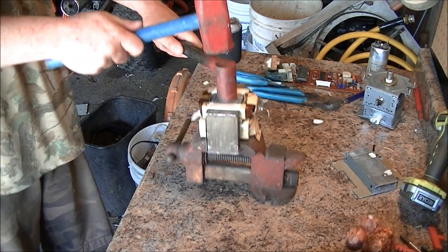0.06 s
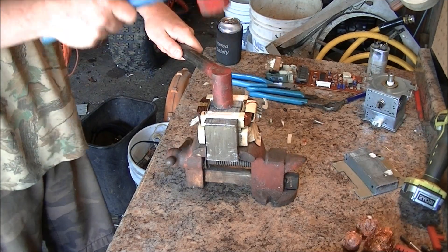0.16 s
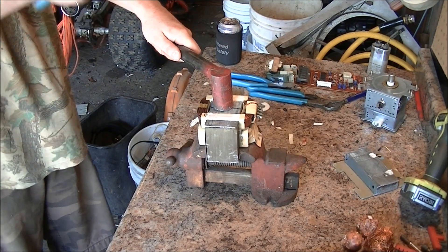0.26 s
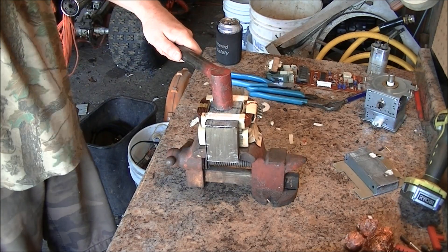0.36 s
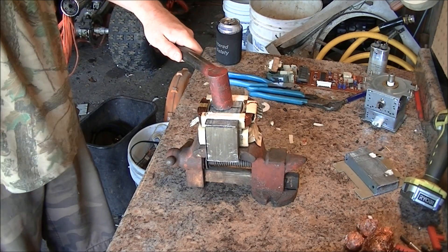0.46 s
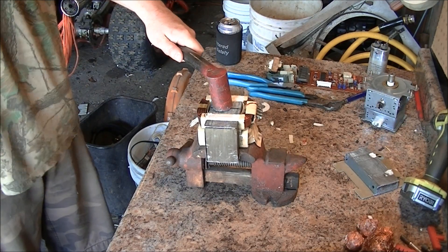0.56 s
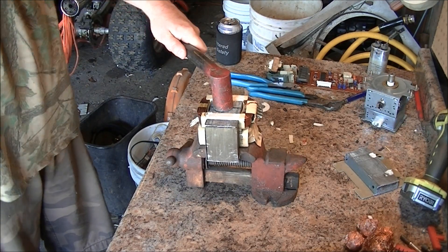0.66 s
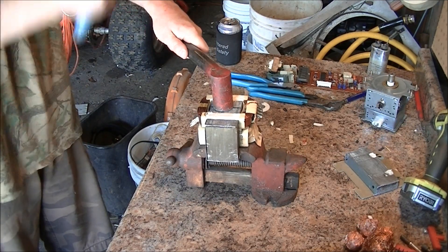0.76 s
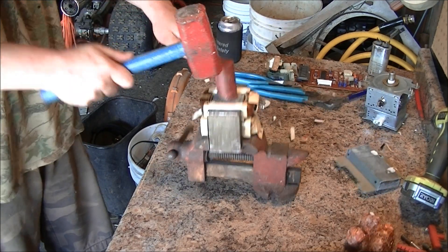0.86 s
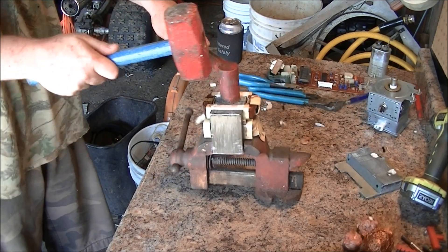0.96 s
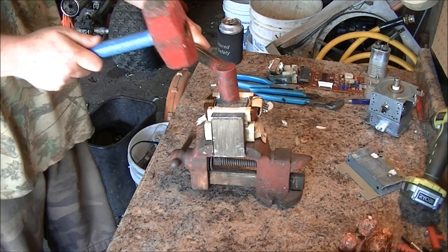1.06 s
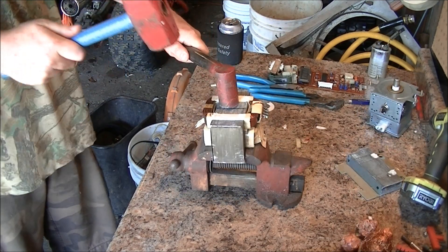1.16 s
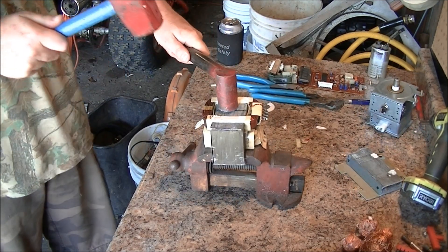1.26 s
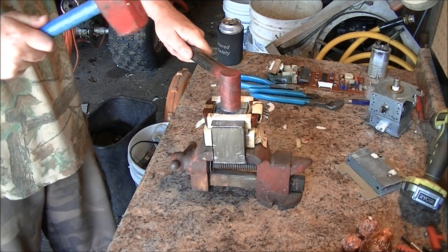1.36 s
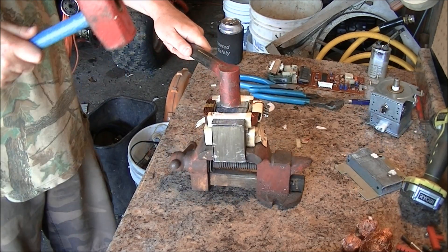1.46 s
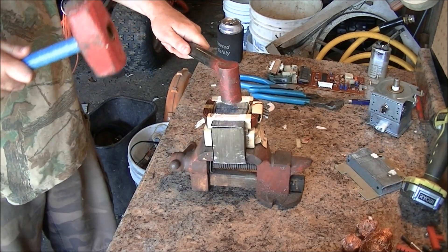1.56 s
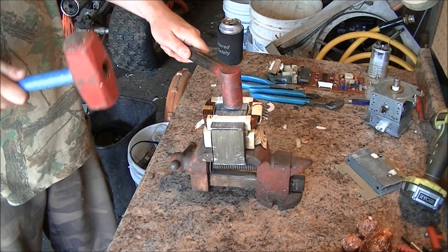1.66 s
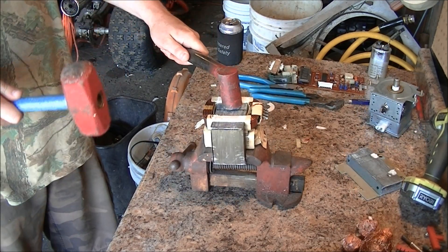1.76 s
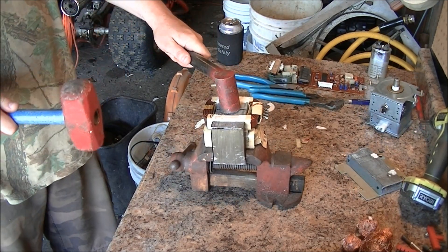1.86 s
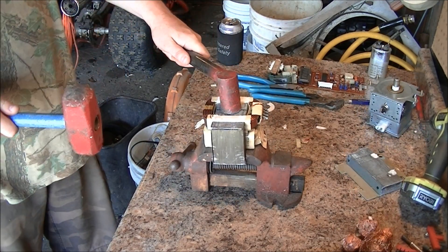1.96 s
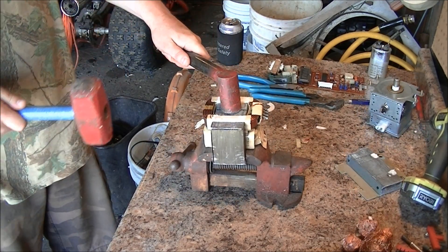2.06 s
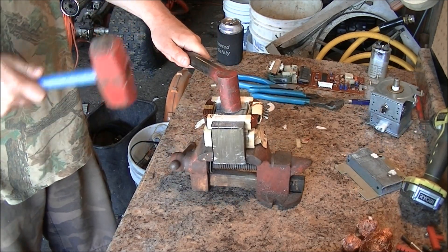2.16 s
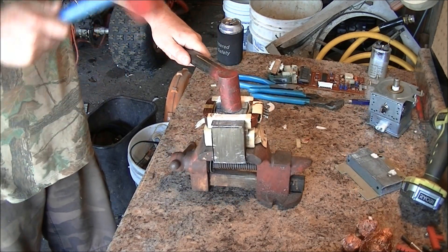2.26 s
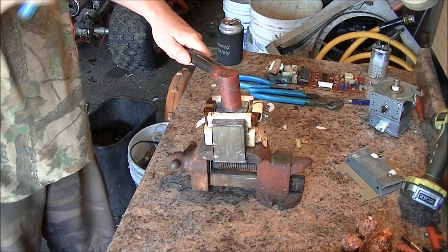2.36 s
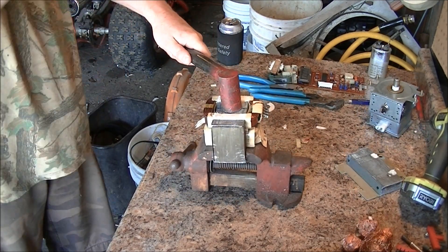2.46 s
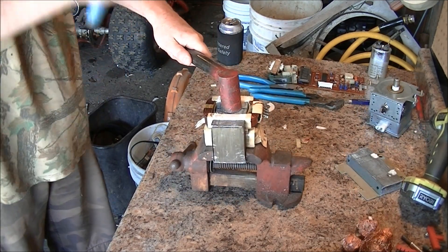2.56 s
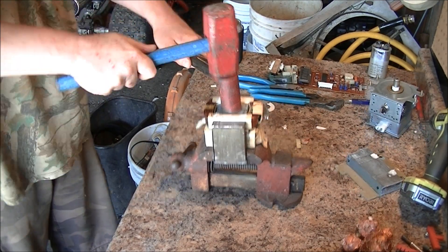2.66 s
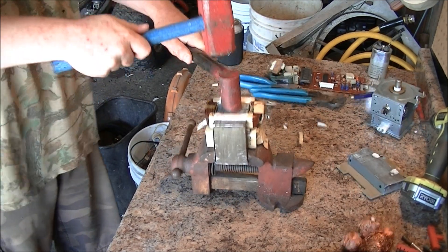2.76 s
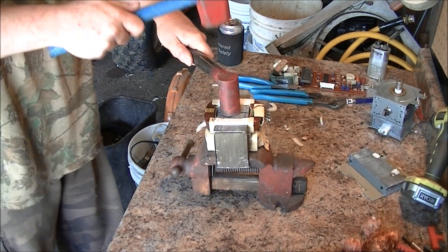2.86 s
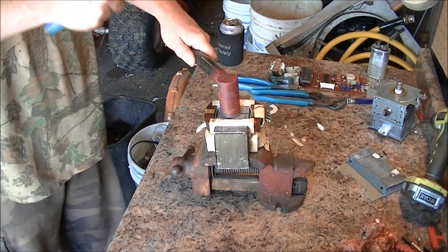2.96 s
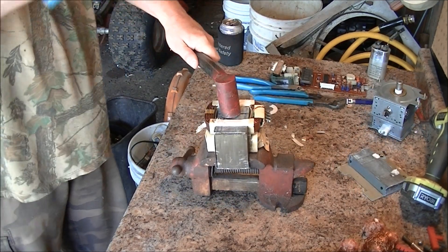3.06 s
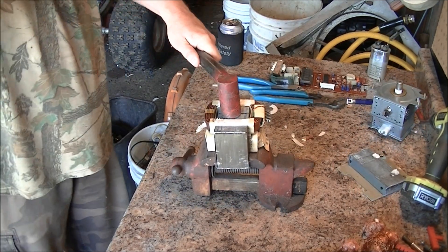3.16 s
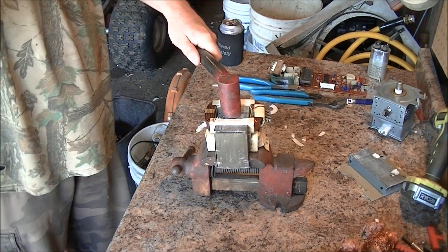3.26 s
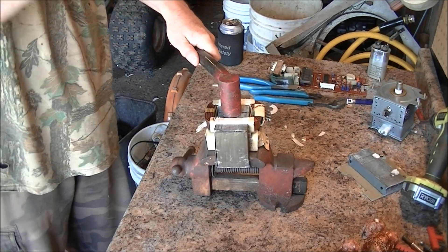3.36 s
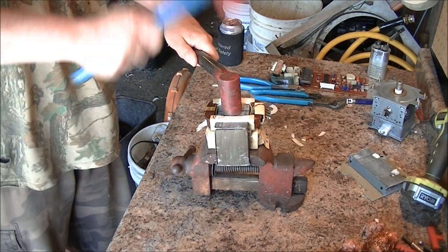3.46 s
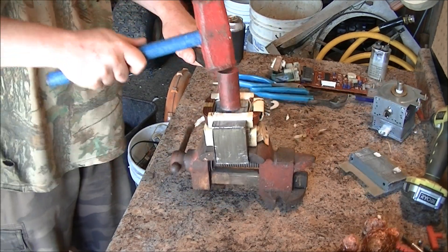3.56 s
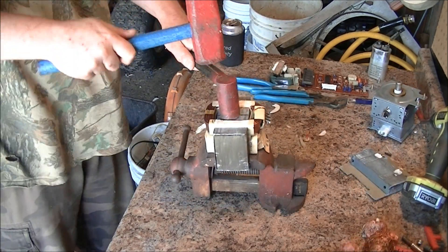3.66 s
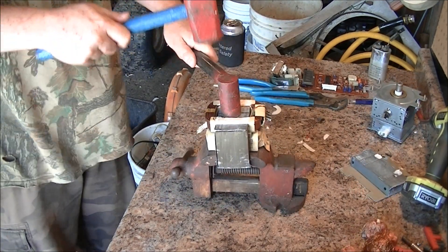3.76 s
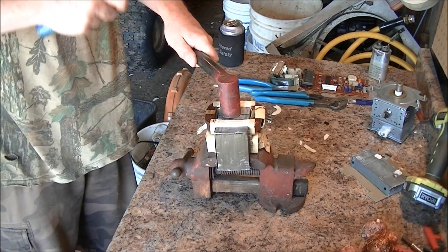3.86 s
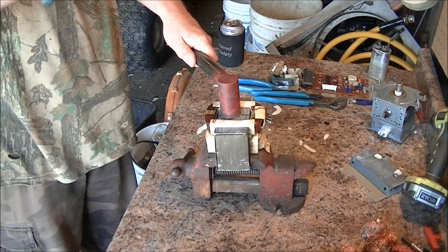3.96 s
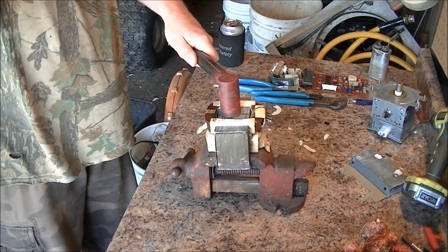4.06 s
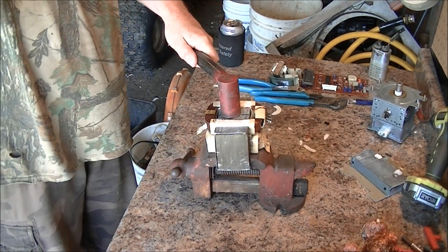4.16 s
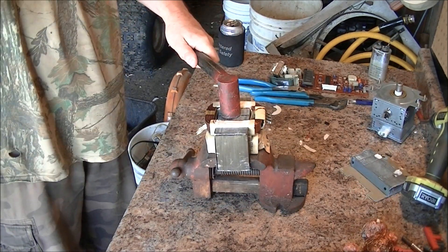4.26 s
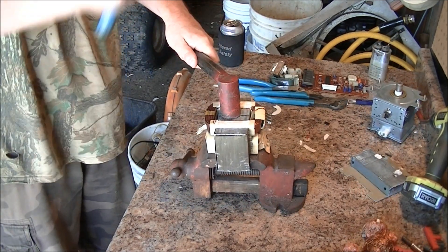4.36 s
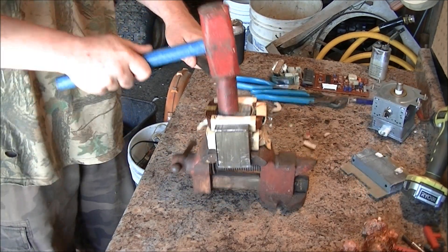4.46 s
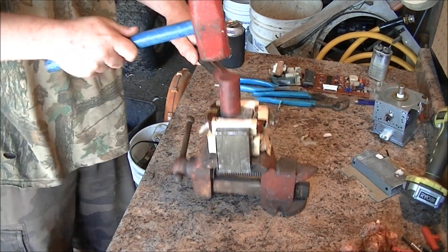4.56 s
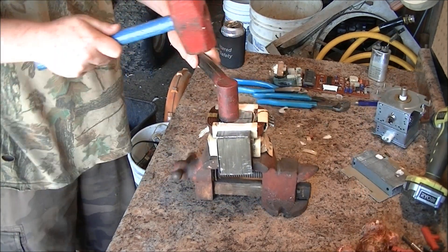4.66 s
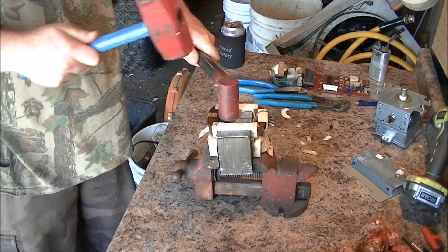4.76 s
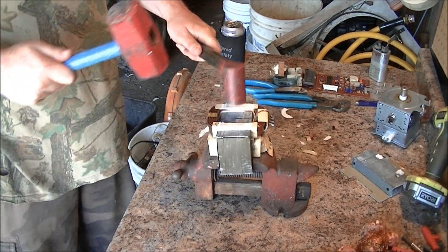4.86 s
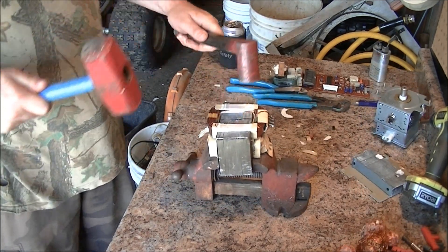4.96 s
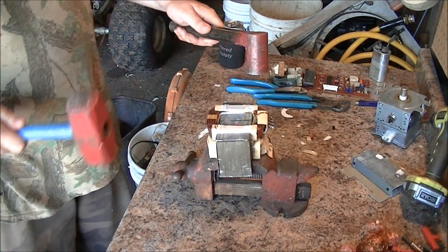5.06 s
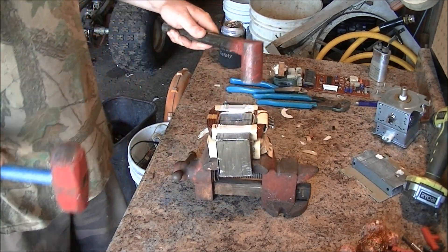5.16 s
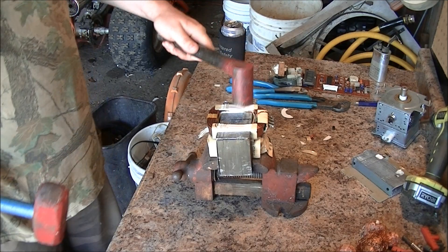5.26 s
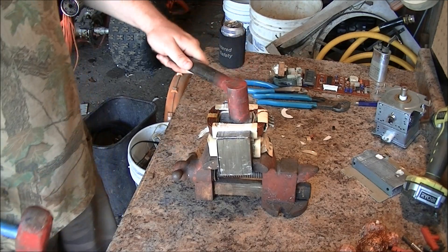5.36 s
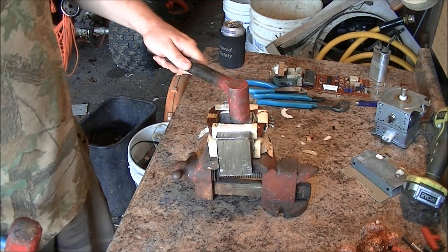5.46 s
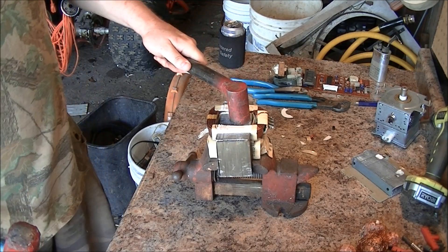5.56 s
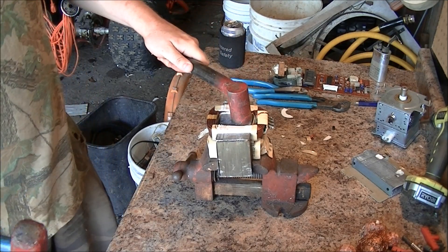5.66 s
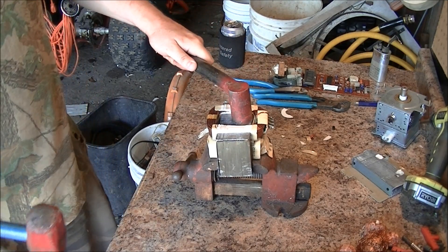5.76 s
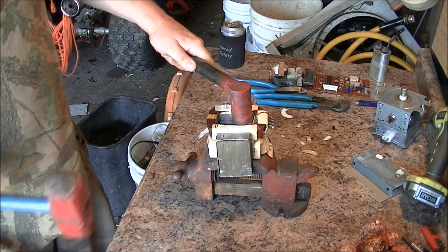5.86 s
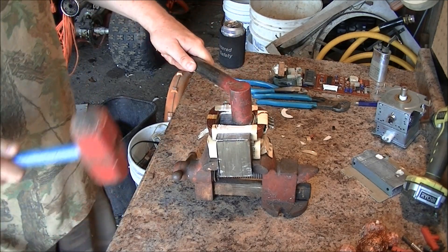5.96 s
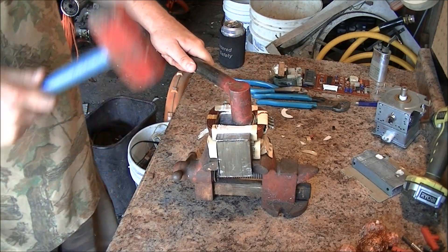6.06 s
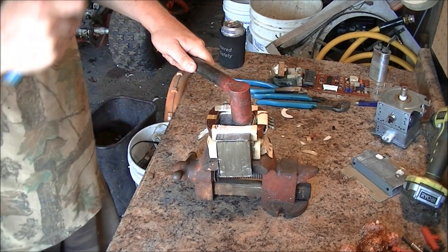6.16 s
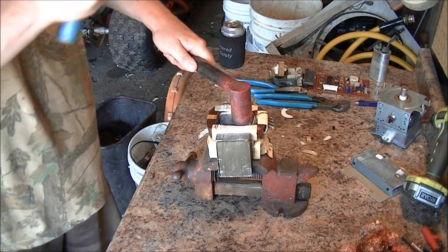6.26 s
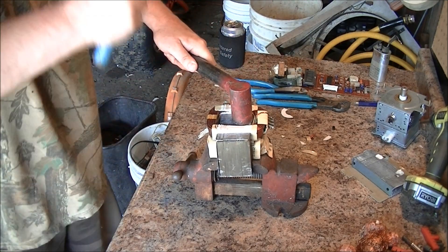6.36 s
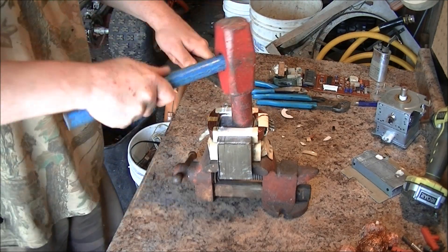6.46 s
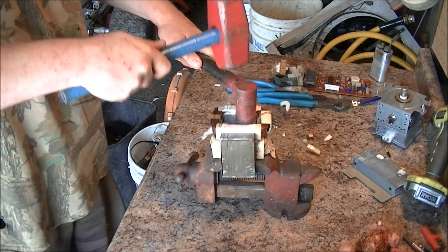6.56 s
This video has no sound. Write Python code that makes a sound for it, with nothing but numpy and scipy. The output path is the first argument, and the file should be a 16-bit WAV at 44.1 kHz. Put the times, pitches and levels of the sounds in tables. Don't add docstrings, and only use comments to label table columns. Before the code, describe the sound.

Six hard metallic hammer strikes, uneven in pace, each shaking a vise and loose tools into a brief harsh clatter over faint machinery hum.

```python
import sys
import numpy as np
from scipy import signal
from scipy.fft import rfft, irfft, next_fast_len
from scipy.io import wavfile

SR = 44100
rng = np.random.default_rng(int(sys.argv[2]) if len(sys.argv) > 2 else 0)


def bounce(signal):
    frames = np.transpose(np.atleast_2d(signal))
    limited = np.clip(frames, -1, 1)
    pcm = np.round(limited * 32767).astype(np.int16)
    wavfile.write(sys.argv[1], SR, pcm)


def volts(x):
    e = np.asarray(x, float) / 20
    return 10 ** e


N = 291501
CUTOFF_HZ = 16000


def rms_one(x):
    return x / np.sqrt(np.mean(x ** 2) + 1e-20)


def band(x, low_hz, high_hz):
    return signal.sosfilt(signal.butter(2, [low_hz, high_hz], "band", fs=SR, output="sos"), x)


def drift(rate_hz):
    pole = np.exp(-2 * np.pi * rate_hz / SR)
    noise = rng.standard_normal(N + 9000)
    return rms_one(signal.lfilter([1], [1, -2 * pole, pole * pole], noise)[9000:])


def clicks(start_s, gains):
    out = np.zeros(N)
    out[np.round(np.asarray(start_s) * SR).astype(int)] = gains
    return out


def ring(x, pitch_hz, t60_s):
    pole, turn = volts(-60 / (t60_s * SR)), 2 * np.pi * pitch_hz / SR
    return signal.lfilter([0, np.sin(turn)], [1, -2 * pole * np.cos(turn), pole * pole], x + 1e-18)


def struck(start_s, level_db, modes, spread_db):
    luck = rng.standard_normal((len(start_s), 2 * len(modes)))
    out = np.zeros(N)
    for k, (hz, mode_db, t60) in enumerate(modes):
        sign = np.sign(luck[:, -1 - k])
        strength = volts(level_db + mode_db + spread_db * luck[:, k])
        out += ring(clicks(start_s, sign * strength), hz, t60)
    return out


def burst(start_s, level_db, t60_s):
    hits = clicks(start_s, volts(level_db)) + 1e-18
    envelope = signal.lfilter([1], [1, -volts(-60 / (t60_s * SR))], hits)
    return envelope * rng.standard_normal(N)


def coloured(spectrum, white):
    hz, db = np.transpose(spectrum)
    bands = int(2.5 * np.log2(hz[-1] / hz[0])) + 1
    edges = np.geomspace(hz[0], min(hz[-1], CUTOFF_HZ), bands + 1)
    centre_db = np.interp(np.log(edges[1:] * edges[:-1]) / 2, np.log(hz), db)
    return rms_one(sum(volts(centre_db[k]) * band(white[k % 2], edges[k], edges[k + 1])
                       for k in range(bands)))


def grains(per_s, clumps, size_db, low_hz, high_hz, cycles):
    sizes = volts(size_db * np.minimum(rng.exponential(1, N), 4)) * rng.choice([-1, 1], N)
    born = sizes * clumps * (rng.random(N) < per_s / SR)
    dealt = rng.integers(0, 14, N)
    pitches_hz = np.geomspace(low_hz, high_hz, 14)
    return rms_one(sum(ring(born * (dealt == k), hz, cycles / hz) for k, hz in enumerate(pitches_hz)))


# start_s, peak_db, head_ring_db, punch_ring_db
HAMMER_BLOWS = [
    (0.036, 5, -13, -11),
    (0.9052, 10, -11, -14.5),
    (2.736, 10, -16, -13),
    (3.5766, 0.5, -14, -22),
    (4.518, -1, -9.5, -43),
    (6.548, 7.5, -10.5, -11.5),
]
# pitch_hz, level_db, t60_s
SLAM_MODES = [(1480, 1.5, 0.0048), (2905, -0.5, 0.0072), (3430, -1.5, 0.0069), (5360, -0.5, 0.004),
              (7000, 1, 0.0047)]
# pitch_hz, level_db, t60_s
HEAD_MODES = [(5975, 0, .05), (5900, -6, .04), (6960, -5, .03), (7400, -5, .03)]
# pitch_hz, level_db, t60_s
PUNCH_MODES = [(10060, 0, .04), (10260, 0, .03), (12250, -12, .02)]


def hammer():
    start_s, peak_db, head_db, punch_db = np.transpose(HAMMER_BLOWS)
    start_s = start_s + .0007
    slam = struck(start_s, peak_db - 3.0, SLAM_MODES, spread_db=2.1)
    crack = band(burst(start_s, peak_db + 5, t60_s=0.0055), 1400, 11400)
    head = struck(start_s, head_db + 5.0, HEAD_MODES, spread_db=-1.0)
    punch = struck(start_s + 0.00095, punch_db - 0.5, PUNCH_MODES, spread_db=-0.5)
    for hz, db, t60 in HEAD_MODES:
        head += volts(db) * ring(burst(start_s, head_db - 33.5, t60_s=0.55), hz, t60)
    for hz, db, t60 in PUNCH_MODES:
        punch += volts(db) * ring(burst(start_s, punch_db - 28, t60_s=0.4), hz, t60)
    return slam + crack + head + punch


# start_s, vigour_db, looseness_db (small parts still loose)
SHUDDERS_BY_BLOW = [
    [(.04, -23.5, 0.5), (.156, -13, -6), (.22, -16.5, -6), (.25, -14, -11), (.324, -13, -10),
     (.48, -43.5, -5.5), (.7, -48, -22)],
    [(.91, -21, -1), (1.004, -14.5, -2), (1.124, -14.5, -6.5), (1.22, -22, -4), (1.328, -20.5, -36),
     (1.368, -44, 11), (1.436, -53, -2), (1.55, -40, -31)],
    [(2.74, -18.5, -6.5), (2.84, -13, -3), (2.906, -16, -4.5), (2.95, -14.5, -1.5), (3.08, -19, -15.5),
     (3.204, -48.5, 0), (3.35, -45, -21)],
    [(3.58, -20, 3), (3.706, -13, -5), (3.808, -15.5, -10.5), (3.864, -16, -8.5), (4.012, -25.5, -27),
     (4.094, -42, -17), (4.15, -58, 4)],
    [(4.52, -22.5, 5.5), (4.654, -12.5, -9.5), (4.754, -15.5, -8), (4.78, -15.5, -12), (4.818, -15.5, -6),
     (4.954, -47.5, 0.5), (5.1, -48, -13)],
    [(6.552, -27.5, 6), (6.574, -17.5, -8), (6.61, -25.5, 9.5)],
]
# full_vigour_db, vigour_share, looseness_share,
# first_kick_db, tap_fade_db_per_s
LAYER_RESPONSE = [(-18, 0.5, 0.68, 3.5, 291), (-15, 0.96, 0.011, 7.5, 598), (-16, 0.96, 0.44, 8, 900),
                  (-14.5, 1.03, 0.97, 17.5, 1100)]
# start_s, bench_db, vise_db, plates_db, chips_db
LIGHT_TAPS = [
    (1.76, -20.5, -27, -27.5, -31),
    (1.909, -17.5, -25, -18.5, -25),
    (5.421, -18, -14.5, -8, -23),
    (5.452, -33, -15, -26, -45),
]


def shaking():
    t, gains = np.arange(N) / SR, np.zeros((4, N))
    full_db, by_vigour, by_loose, kick_db, fade = np.transpose(LAYER_RESPONSE)[:, :, None]
    full_vigour_db, kick_s = -14.5, 0.0041
    for rows in SHUDDERS_BY_BLOW:
        start_s, vigour_db, loose_db = np.transpose(rows)
        on = (t >= start_s[0]) & (t < start_s[-1])
        level_db = full_db + by_vigour * (np.interp(t[on], start_s, vigour_db) - full_vigour_db)
        level_db = level_db + by_loose * np.interp(t[on], start_s, loose_db)
        gains[:, on] += volts(level_db + kick_db * np.exp((start_s[0] - t[on]) / kick_s))
    for start_s, *start_db in LIGHT_TAPS:
        on = (t >= start_s) & (t < start_s + .5)
        gains[:, on] += volts(np.c_[start_db] - fade * (t[on] - start_s))
    return gains


# pitch_hz, level_db
CHINK_PITCHES = [(4625, -4.5), (5400, 2.5), (5980, 1.5), (7400, 1), (8600, -11), (10200, 4), (11398, -37),
                 (12250, -6)]


def chinks(clumps):
    sizes = volts(2.4 * np.minimum(rng.exponential(1, N), 3))
    born = clumps * sizes * (rng.random(N) < 400 / SR)
    dealt = rng.integers(0, len(CHINK_PITCHES), N)
    return rms_one(sum(volts(db) * ring(born * (dealt == k), hz, t60_s=0.027)
                       for k, (hz, db) in enumerate(CHINK_PITCHES)))


# pitch_hz, level_db (per Hz)
CHIP_SPECTRUM = [(2350, -40), (4000, -1), (5100, -0.5), (8020, -4.5), (10400, 0), (10800, -14.5),
                 (13800, -9), (16000, -41)]


def clatter():
    jolt_db = 1.9 * drift(45)
    bench = grains(400, volts(jolt_db + 1.0 * drift(27)), 3.1, 106.4, 473, cycles=5.1)
    vise = grains(2200, volts(jolt_db + 1.5 * drift(40)), 2.8, 600, 1550, cycles=9.0)
    plates = grains(4000, volts(jolt_db + 1.5 * drift(60)), 3.0, 1650, 4300, cycles=12.0)
    hiss = coloured(CHIP_SPECTRUM, rng.standard_normal((2, N))) * volts(jolt_db + 3.1 * drift(92.7))
    chips = volts(-1.5) * (rms_one(hiss) + chinks(volts(jolt_db)))
    trim = volts([[-1.5], [-1.5], [-1.5], [-2.5]])
    return np.sum(shaking() * trim * [bench, vise, plates, chips], axis=0)


# start_s, peak_db, thud_db, tick_db
PART_TOUCHES = [(0.125, -2.5, -11.5, -9), (0.148, 4, -14, -9), (0.165, -3.5, -6, -16),
                (0.186, -2, -16, -16), (0.236, 4, -14.5, -10), (0.245, 5.5, -40, -25),
                (0.26, -5.5, -16, -5), (1.001, -1, -29, -33), (1.023, 2.5, -20, -13),
                (1.038, 0.5, -11, -18), (1.111, -3.5, -6, -2.5), (1.134, -10, -13, 0),
                (2.8445, 3.5, -16.5, -13), (2.876, -4, -8, -0.5), (2.92, -2, -17, -11),
                (2.934, 3.5, -26, -17), (2.949, -9.5, -12, 5.5), (3.664, -2.5, -10, -19.5),
                (3.687, 2, -26, -8), (3.692, -1, -20, -9), (3.709, -5, -6, -27), (3.733, -2.5, -12.5, -6),
                (3.776, -1.5, -4.5, -9), (3.791, 1.5, -21, -12), (3.845, -7, -2, -18),
                (4.617, 1.5, -18, -10), (4.628, 1, -19, -16.5), (4.655, -5.5, -5.5, -6),
                (4.67, -9, 2.5, -24), (4.732, -7, -6, -4),
                (0.059, -8, -13, -12), (0.0965, -12, -14, -4), (0.3338, -7, -15, -20),
               (0.9283, -8, -14, -17), (0.9756, -10, -22, -9), (1.0801, -10, -8, -4),
               (2.7704, -9, -15, -13), (2.8205, -3, -17, -17), (2.8514, -9, -12, -23),
               (2.885, -9, -17, -12), (2.9648, -5, -17, -2), (3.604, -16, -17, -16), (3.6392, -8, -12, -10),
               (3.749, -13, -17, -10.5), (3.8118, -13, -6, -12), (3.8997, -2.5, -28, -16),
               (4.56, -6, -11, -12), (4.5931, -1.5, -13, -12), (4.6595, -15, -11, -18),
               (4.6998, -17, -9, -10), (4.741, -5, -11, -6), (4.7484, 2.5, -23, -12.5),
               (4.8339, -6, -15.5, -12), (6.5799, -13, -6, -12),
                (5.4085, -19, -10, 4),
    (5.4195, -2, -22, -7),
    (3.021, -7.5, -26, -2),
    (3.6, -7, -17, -32),
    (1.255, -17, -26, -26),
]
# start_s, peak_db, tick_db
BAR_BOUNCES = [(0.286, -7, -16), (0.317, 0.5, -21), (0.369, -13, -15), (0.391, -18.5, -7),
               (1.176, 0.5, -12), (1.239, 2, -26), (1.289, 1, -50), (1.31, -8, -27), (1.364, -12.5, -8),
               (2.985, -1, -9), (3.042, 3.5, -29), (3.064, -27, 10), (3.074, 1, -61), (3.09, -2.5, -57),
               (3.11, -19.5, 4.5), (3.867, 1, -13), (3.935, 3.5, -22.5), (3.972, 0.5, -34),
               (3.997, 2.5, -44), (4.763, 1, -18), (4.82, -12, -9), (5.429, -5, -44), (5.453, -6, -46)]
# start_s, peak_db, thud_db, tick_db
SMALL_SETTLING = [(0.448, -16.5, -27, -12), (0.462, -17, -20, -22), (0.533, -18, -34, -20),
                  (0.551, -32, -31, -17), (0.596, -22.5, -29, -16), (0.635, -33.5, -15, -1),
                  (0.649, -26.5, -16, -21), (0.834, -25.5, -7, -20), (1.339, -21.5, -3, 4),
                  (1.347, -16.5, -7.5, 8.5), (1.41, -26, -12, -18), (1.494, -33.5, 7, -34),
                  (1.524, -37, 7, -25), (1.569, -40, 2, -17), (1.628, -41.5, 9.5, -23),
                  (1.753, -14.5, -8, -0.5), (1.906, -2, -15, -18), (3.172, -33.5, -1, 3),
                  (3.282, -29, -6, -20), (4.397, -24.5, -2.5, -35), (4.856, -19, -11, 4),
                  (4.912, -28, -2, 2.5), (4.973, -32.5, -2, 0)]
# start_s, tick_db
GRIT_CRACKLES = [
    (5.672, -40),
    (5.685, -42),
    (5.694, -41),
    (5.737, -45),
    (5.742, -46),
    (5.876, -40),
    (5.56, -54),
    (3.515, -42),
    (3.54, -40),
]


def contacts():
    rows = [(s, db, db + thud, db - 8.5, db + tick)
            for s, db, thud, tick in PART_TOUCHES]
    rows += [(s, db + 0.33 * (tick + 33), db - 28, db - 11.5, db + tick) for s, db, tick in BAR_BOUNCES]
    rows += [(s, db, db + thud, db - 6.5, db + tick) for s, db, thud, tick in SMALL_SETTLING]
    rows += [(s, db - 12, db - 17, db - 15, db) for s, db in GRIT_CRACKLES]
    return np.transpose(rows)


# pitch_hz, level_db, t60_s
BENCH_MODES = [(146, -10, 0.093), (220, 1, 0.036), (244.4, -1.5, 0.079), (350.6, 2, 0.06),
               (446, -4.5, 0.089)]
# pitch_hz, level_db, t60_s
VISE_MODES = [(649, -12, 0.016), (780, -3, 0.025), (890, 0, 0.025), (1157, -2.5, 0.037),
              (1290, -3.5, 0.035), (1450, -3.5, 0.035)]
# pitch_hz, level_db, t60_s
PLATE_MODES = [(1652, 5, 0.018), (1862, 2.5, 0.021), (2057, 1, .03), (2450, 1.5, 0.018), (2720, 5, 0.017),
               (3140, -3, 0.022), (3580, -15.5, .02)]
# start_s, level_db, pitch_hz, t60_s
BENCH_PUSHES = [
    (1.7547, -6.5, 187, 0.033),
    (1.9078, -10, 190, 0.048),
    (5.412, -11, 168, 0.027),
]


def knocks():
    start_s, peak_db, thud_db, vise_db, tick_db = contacts()
    start_s = start_s + .001
    snap = band(band(clicks(start_s, volts(peak_db + 6.0)), 550, 4800), 456, 6000)
    snap += band(burst(start_s, peak_db - 13.0, t60_s=0.062), 880, 2800)
    thud = struck(start_s, thud_db - 1.5, BENCH_MODES, spread_db=3.5)
    for push_s, db, hz, t60 in BENCH_PUSHES:
        thud -= ring(clicks([push_s], volts(db)), hz, t60)
    vise = struck(start_s, vise_db - 10, VISE_MODES, spread_db=3.0)
    plates = struck(start_s, peak_db - 18.5, PLATE_MODES, spread_db=1.0)
    tick = band(burst(start_s, tick_db + 2.5, t60_s=0.014), 4800, 12400)
    return snap + thud + vise + plates + tick


# pitch_hz, level_db, t60_s
JAW_MODES = [(419, -12, 0.052), (877, 1.5, 0.022), (1234, 0.5, 0.019), (1525, -5.5, 0.036),
             (2080, -8.5, 0.012), (2650, -6.5, 0.012), (3250, -11, 0.013)]


def jaw():
    start_s, peak_db, _ = np.transpose(BAR_BOUNCES)
    level_db = peak_db - 10
    touches = clicks(start_s + 0.0012, volts(level_db))
    touches += clicks(start_s + 0.0155, volts(level_db - 11))
    touches += burst(start_s + .003, level_db - 25, t60_s=0.094)
    return sum((-1) ** k * volts(db) * ring(touches, hz, t60) for k, (hz, db, t60) in enumerate(JAW_MODES))


# start_s, pitch_hz, level_db, t60_s
TOOL_CLINKS = [(.095, 6020, -11, .03), (.148, 5540, -7, .02), (.188, 5600, -14, .02),
               (.237, 6050, -14, .02), (.258, 5750, -9, .012), (.285, 2280, -9, .02),
               (.318, 2040, -13, .025), (.37, 4000, -21, .015), (.394, 3730, -18.5, .015),
               (1.04, 1500, -14, .025), (1.11, 2030, -9, .02), (1.13, 4960, -18, .03),
               (1.172, 4200, -12, 0.022), (2.846, 5730, -3, .02), (2.883, 5700, -12, .02),
               (2.934, 1610, -8, .025), (2.948, 4560, -11, .025), (3.021, 1900, -13, .025),
               (3.689, 1980, -4, 0.029), (3.694, 5600, -10, .02), (3.709, 600, -7, .04),
               (3.734, 5560, -8, .012), (3.79, 5800, -11, .02), (4.628, 1510, -9, 0.027),
               (4.66, 320, -9, .03), (4.749, 5730, -14, .012), (5.4205, 1514, -9, 0.039),
               (5.42, 3040, -6.5, 0.022), (5.42, 5570, -12, 0.016), (5.4303, 870, -9.5, 0.033),
               (5.454, 1000, -18, 0.072), (5.454, 1240, -21, .08), (5.432, 1236, -12, .07),
               (5.43, 438, -21, .1), (5.432, 2336, -24, 0.044), (5.454, 2450, -28, 0.037),
               (5.44, 5200, -29, .03), (1.76, 850, -24, .04), (1.912, 806, -22.5, 0.045),
               (1.94, 1750, -28, .03), (5.684, 7000, -44, .03), (.834, 3200, -40, .03),
               (6.557, 3460, -16, .025), (6.595, 3250, -14, .04)]
# start_s, peak_db, pitch_hz
VISE_THUMPS = [(0.124, -7, 883), (0.149, -4, 1070), (0.164, -3, 412), (0.235, -2, 791), (0.244, -3, 713),
               (0.317, -6, 797), (0.833, -30, 805), (1.039, -4, 1040), (1.039, -2, 353), (1.111, -4, 334),
               (2.829, -6, 1160), (2.851, -6, 829), (2.876, -7, 353), (2.919, -2, 598), (2.946, -7, 347),
               (3.707, -3, 393), (3.714, -4, 686), (3.776, -4, 301), (3.79, -2, 969), (4.397, -26, 751),
               (4.627, -5, 781), (4.658, -2, 318), (4.747, -4, 773)]


def clinks():
    out, t = np.zeros(N + SR), np.arange(SR // 8) / SR
    thumps = [(s + .002, hz, db - 3, 4.0 / hz) for s, db, hz in VISE_THUMPS]
    for start_s, hz, db, t60 in TOOL_CLINKS + thumps:
        tone = volts(db - 60 * t / t60) * np.sin(2 * np.pi * hz * t)
        out[round(start_s * SR):][:len(t)] += tone
    return out[:N]


# pitch_hz, split_hz, flight_t60_s, landed_t60_s, twin_share
BAR_MODES = [(5177, 21, .5, .1, .3), (10045, 30, .4, .08, .3), (11398, 5, .9, .5, .3),
             (13740, 25, .4, .06, .3), (9320, 8, .6, .3, .3), (3140, 34, .17, .03, .7),
             (1845, 15, .4, .08, .3), (4625, 40, .3, .08, .3), (4020, 40, .15, .05, .3),
             (4975, 30, .3, .04, .3), (5980, 45, .35, .05, .6), (4360, 30, .3, .04, .5)]
# start_s, flight_s, level_db, upper_db (second mode relative to the first)
BAR_THROWS = [(.097, 0.05, -18, -21), (0.181, 0.085, -29, 11), (.198, .04, -22, -25), (.278, 0.04, -23, -7),
              (.435, 0.014, -48, 13), (1.022, 0.0042, -10.5, -25), (1.19, 0.045, -18.5, 2),
              (1.252, 0.024, -29, 1), (1.288, .05, -37, -5), (2.78, 0.027, -23, -20),
              (2.813, .022, -16, -22), (2.838, .02, -28, -20), (2.86, .07, -52, 17),
              (2.995, 0.057, -40, 13), (3.05, .04, -39, -15), (3.6, .05, -31, -20), (3.725, 0.024, -51, 28),
              (3.797, 0.017, -44, 18), (3.876, 0.12, -35.5, 11.5), (3.884, 0.017, -19.5, -30),
              (3.917, 0.0096, -17, -30), (3.955, 0.12, -34, -22), (4.6, 0.045, -26, -15),
              (4.69, .04, -26, 2), (4.778, 0.1, -18, -23), (4.856, 0.011, -54, 19), (5.439, .01, -43, -20)]
# start_s, flight_s,
# level_db
LOOSE_PINGS = [
    [(.095, .055, -30), (.34, .3, -40), (.94, 0.092, -31), (4.585, 0.027, -36)],
    [(1.18, .1, -38), (.1, .08, -40), (.2, .1, -42), (1.2, .06, -37)],
    [(.43, .1, -45)],
    [(1.364, .02, -30), (1.906, 0.013, -20), (1.945, .03, -38), (5.44, .03, -28), (3.073, 0.021, -54),
     (6.585, 0.033, -19)],
    [(4.77, 0.088, -16), (5.432, 0.026, -34)],
    [(2.95, .027, -27), (3.885, .044, -30), (5.421, .011, -39)],
    [(5.421, 0.01, -17)],
    [(2.964, .022, -22), (3.018, 0.013, -19)],
    [(.05, .1, -30), (3.585, .105, -22), (4.545, .018, -23), (4.598, .025, -21), (3.65, .02, -24),
     (6.55, 0.0084, -26), (.915, 0.09, -33), (2.745, .07, -25)],
    [(2.948, .037, -28), (4.69, 0.045, -30)],
]


def loose_bar():
    out, t = np.zeros(N + SR), np.arange(SR // 2) / SR
    lower = [row[:3] for row in BAR_THROWS]
    upper = [(s, flight, db + lead) for s, flight, db, lead in BAR_THROWS]
    for rows, (hz, split, free, landed, twin) in zip([lower, upper, *LOOSE_PINGS], BAR_MODES):
        for (start_s, flight, db), phase in zip(rows, 2 * np.pi * rng.random(len(rows))):
            fade_db = -60 * (np.minimum(t, flight) / free + np.maximum(t - flight, 0) / landed)
            swell = np.minimum(t / (0.0012 + 0.21 * flight), 1)
            pair = np.sin(2 * np.pi * hz * t)
            pair += twin * np.sin(2 * np.pi * (hz - split) * t + phase)
            out[round(start_s * SR):][:len(t)] += volts(db + fade_db) * swell * pair
    return out[:N]


def garage(x):
    t60_s, wall_cut_hz = 0.29, 4500
    size = next_fast_len(N + SR)
    hz = np.arange(size // 2 + 1) * SR / size
    out = np.zeros((2, len(hz)), complex)
    for k, lag_s in enumerate(rng.uniform(.012, .04, 16)):
        loss = volts(-60 * lag_s / t60_s) / (1 + 1j * hz / wall_cut_hz)
        trip = loss * np.exp(-2j * np.pi * hz * lag_s)
        out[k % 2] += trip / (1 - trip) * (-1) ** (k // 2)
    return irfft(out * rfft(x, size), size)[:, :N]


# pitch_hz, level_db (per Hz)
HUM_SPECTRUM = [(15, -50), (25, -34.5), (44, -5), (87, -36), (114, -4), (175, -15), (212, 1), (285, -14),
                (531, -11.5), (641, -11), (1370, -14), (2840, -26), (4610, -28.5), (16000, -43.5)]
# pitch_hz, width_hz, level_db
MACHINE_DRONES = [(54.3, 37, -53), (124.5, 10.4, -47.5), (206.6, 11, -47.5)]


def machinery():
    hum_db = -39.5
    mid = volts(hum_db - 2.0 + 0.45 * drift(4.6)) * coloured(HUM_SPECTRUM, rng.standard_normal((2, N)))
    for hz, width, db in MACHINE_DRONES:
        mid += volts(db) * rms_one(band(rng.standard_normal(N), hz - width / 2, hz + width / 2))
    side = volts(hum_db - 15.5) * coloured(HUM_SPECTRUM, rng.standard_normal((2, N)))
    side -= volts(-26) * band(mid, 15, 300)
    return mid + side * [[1], [-1]]


def scene():
    parts = band(clatter() + knocks() + jaw() + clinks(), 119, 10900)
    steel = hammer() + loose_bar()
    bench = parts + steel
    left, right = volts(-13) * garage(bench)
    spread = left - right
    side = volts(-25.0) * spread + volts(-20) * band(spread, 980, 4100) + volts(-14) * band(spread, 3200, 9500)
    side += volts(-21.0) * band(np.gradient(steel), 2000, 11000)
    side -= volts(-24) * band(bench, 30, 900)
    return bench + (left + right) / 2 + side * [[1], [-1]] + machinery()


def roll_off(x):
    return signal.sosfilt(signal.butter(12, 15950, fs=SR, output="sos"), x)


def record(dry):
    held = np.clip(2.33 * np.tanh(dry / 2.67), -1, 1)
    low_pass = signal.cheby2(12, 62, 1.03 * CUTOFF_HZ, fs=SR, output="sos")
    mix = signal.sosfilt(low_pass, held)
    return roll_off(mix)


dry = scene()
out = record(dry)
bounce(out)
```